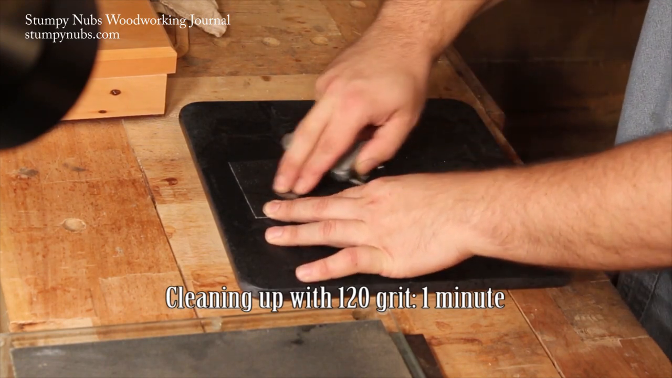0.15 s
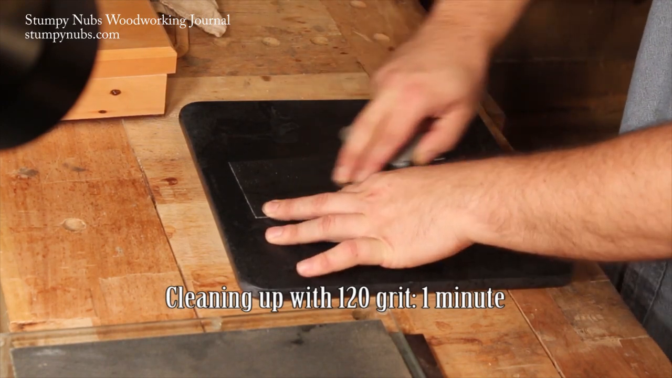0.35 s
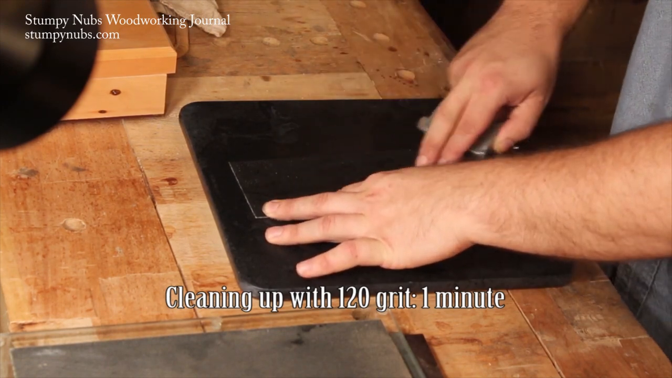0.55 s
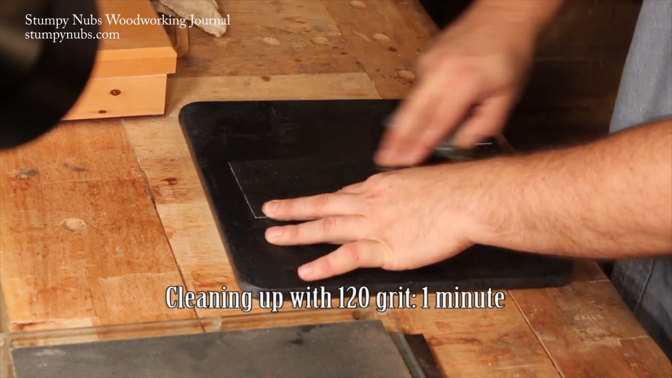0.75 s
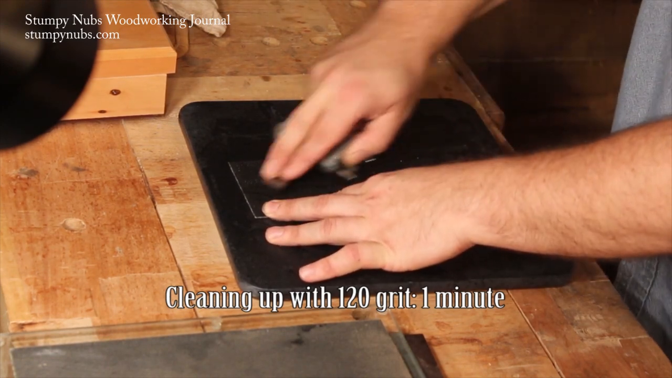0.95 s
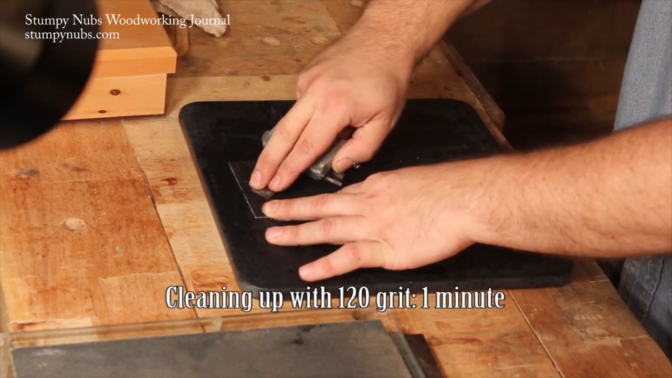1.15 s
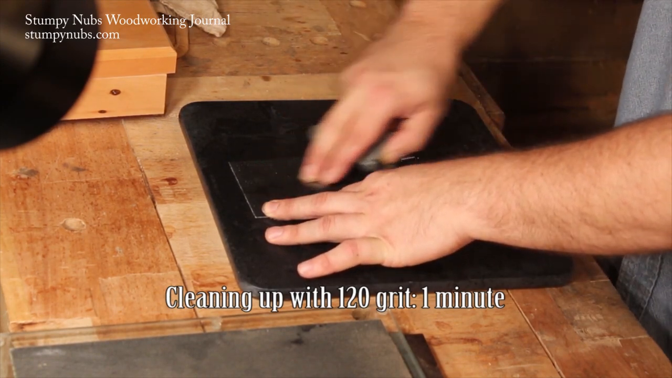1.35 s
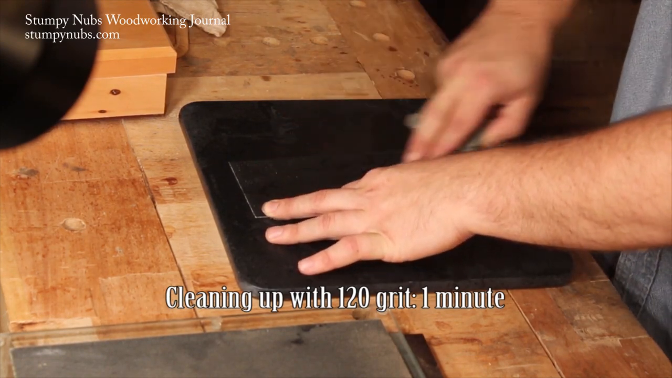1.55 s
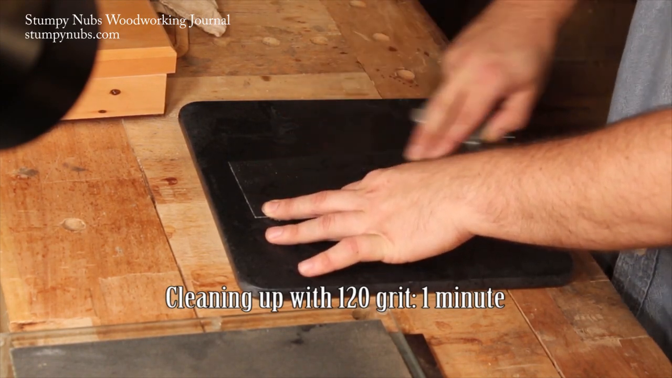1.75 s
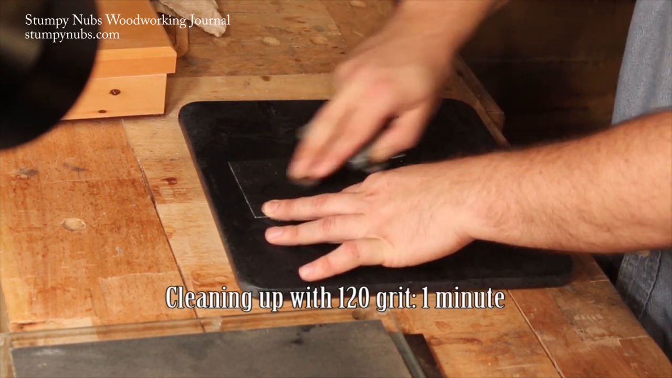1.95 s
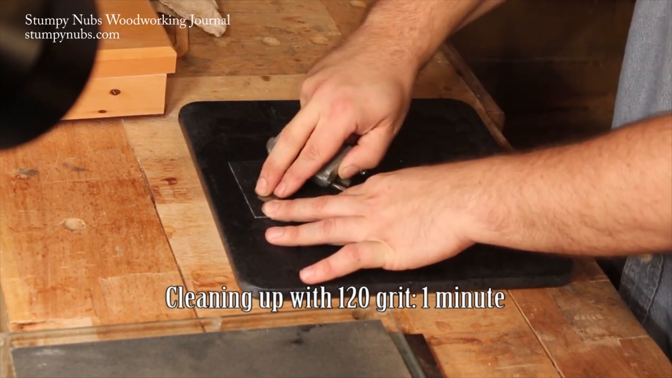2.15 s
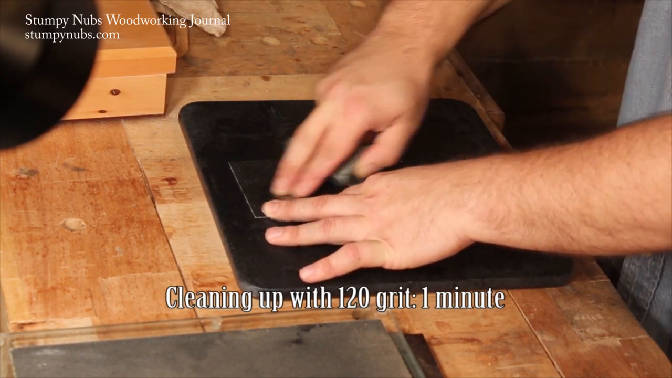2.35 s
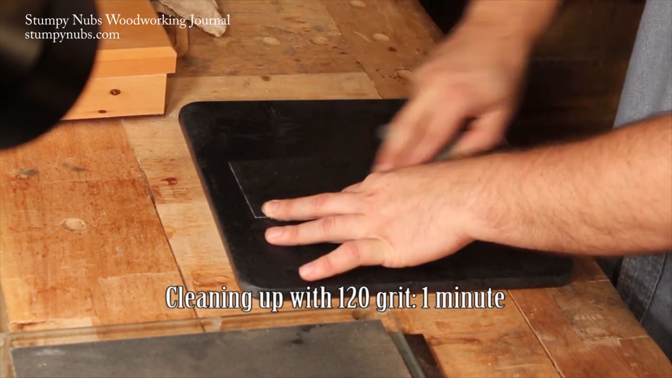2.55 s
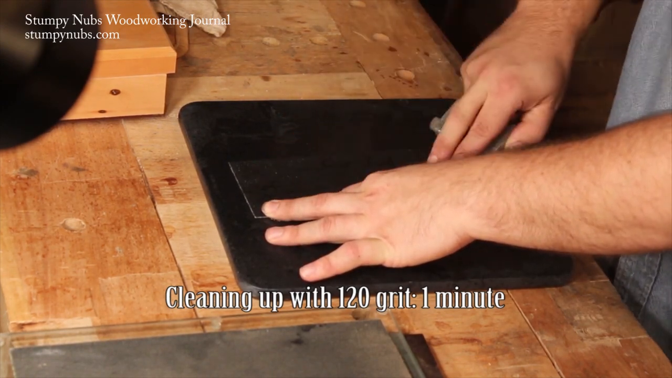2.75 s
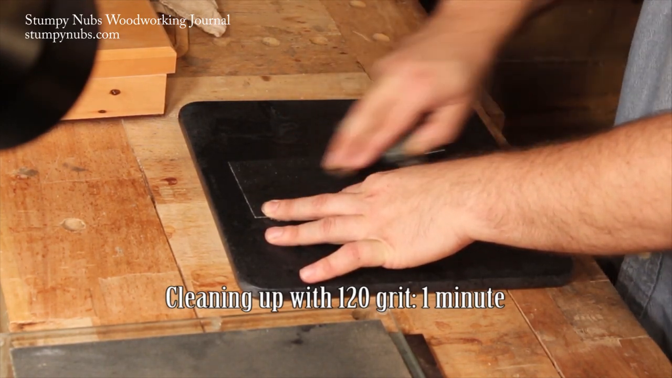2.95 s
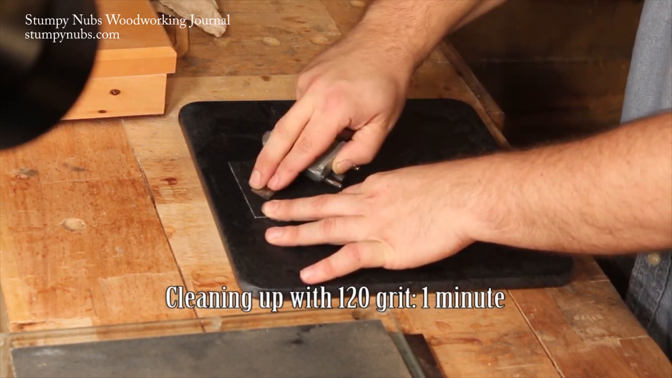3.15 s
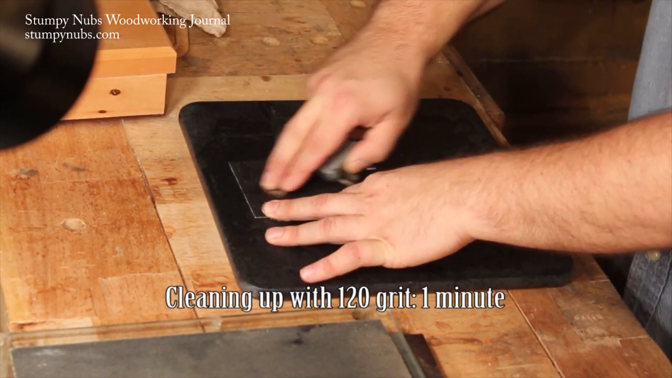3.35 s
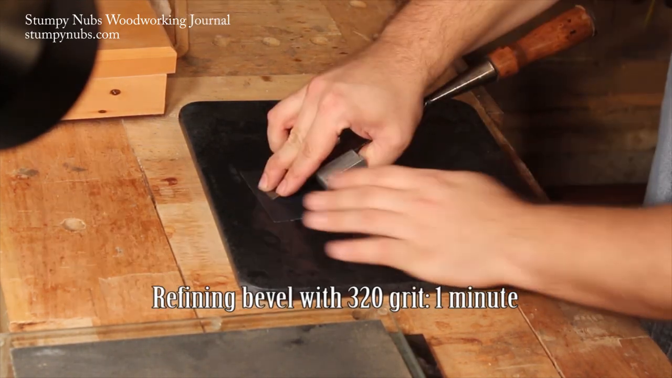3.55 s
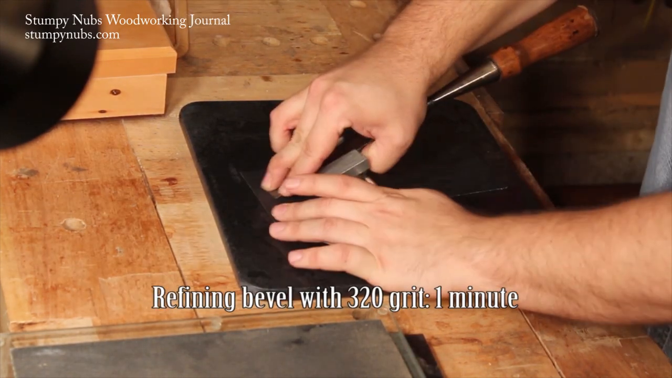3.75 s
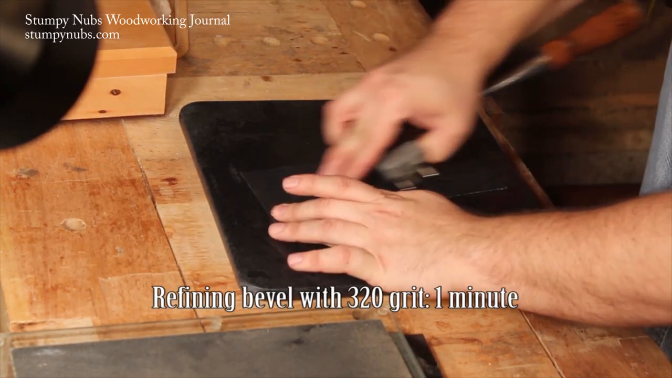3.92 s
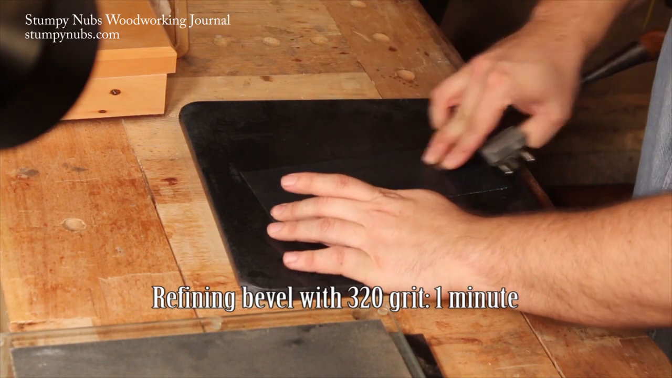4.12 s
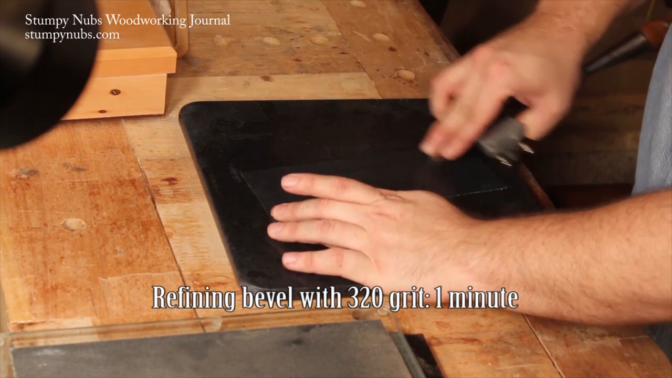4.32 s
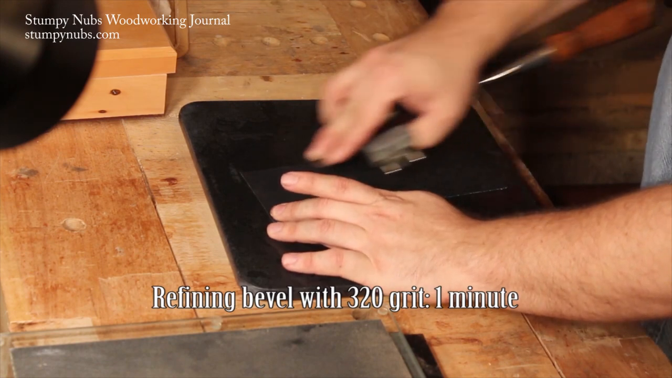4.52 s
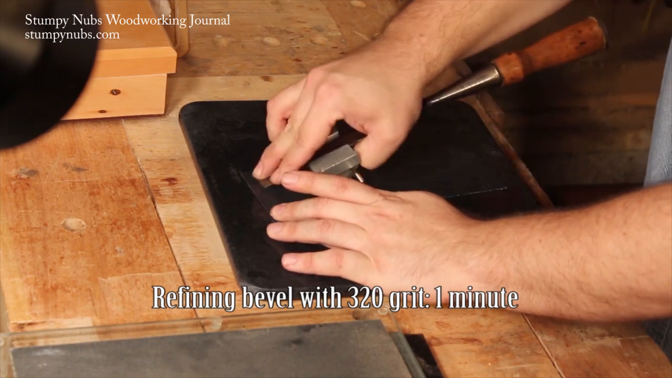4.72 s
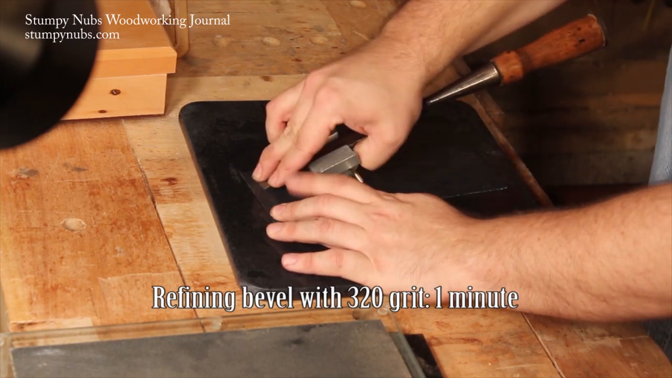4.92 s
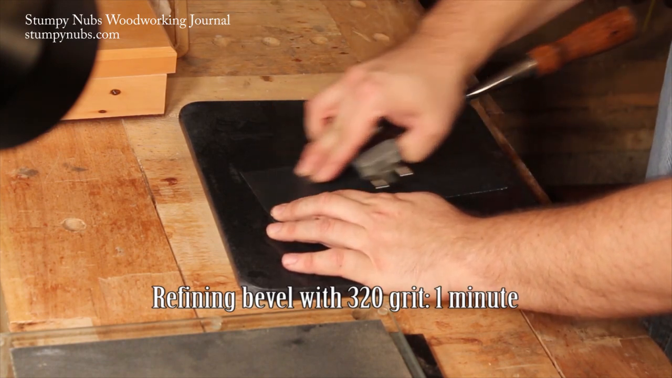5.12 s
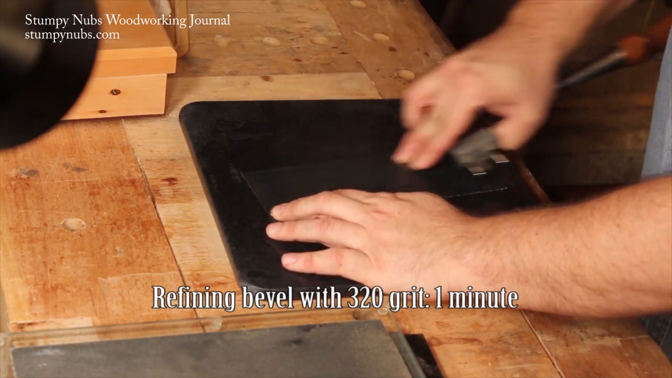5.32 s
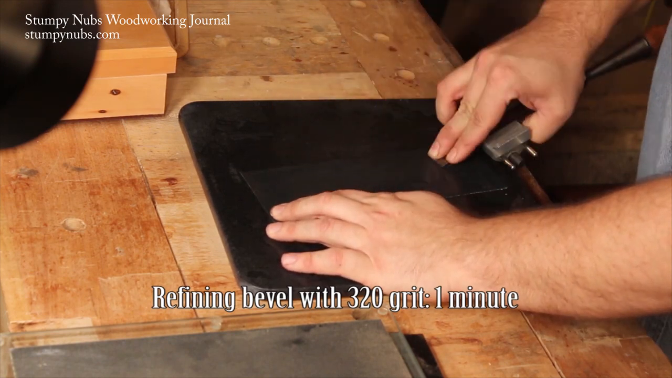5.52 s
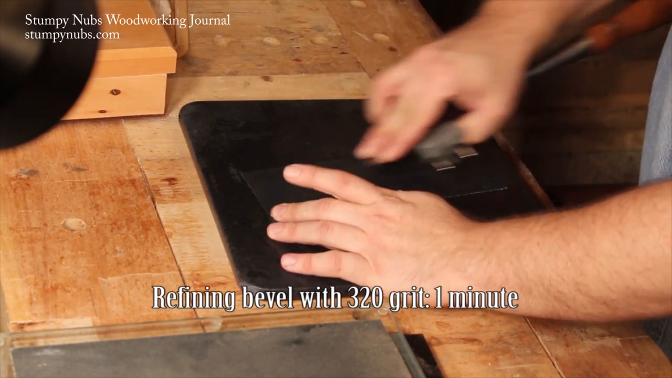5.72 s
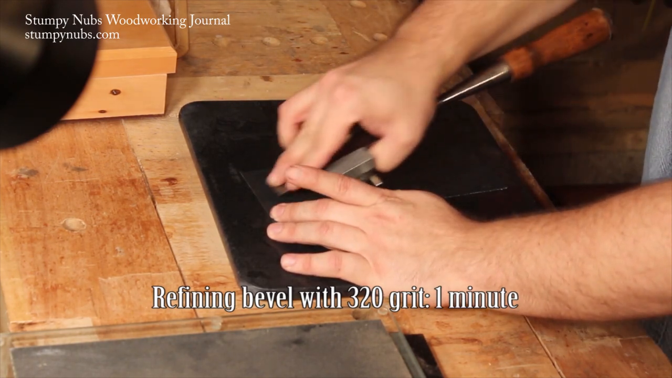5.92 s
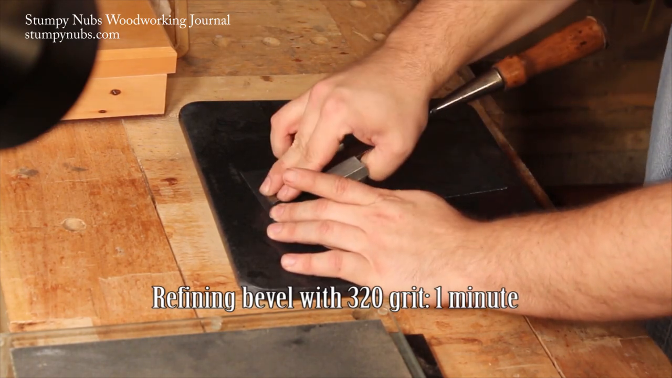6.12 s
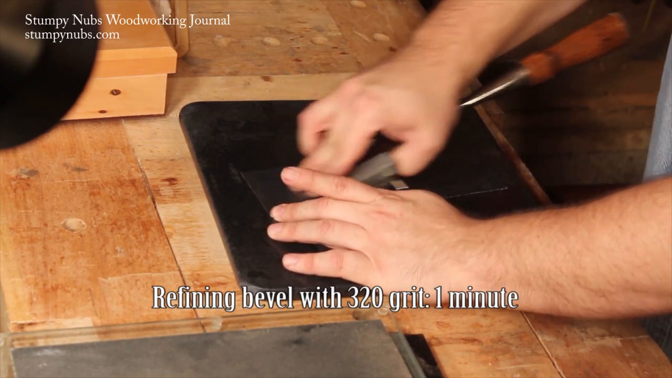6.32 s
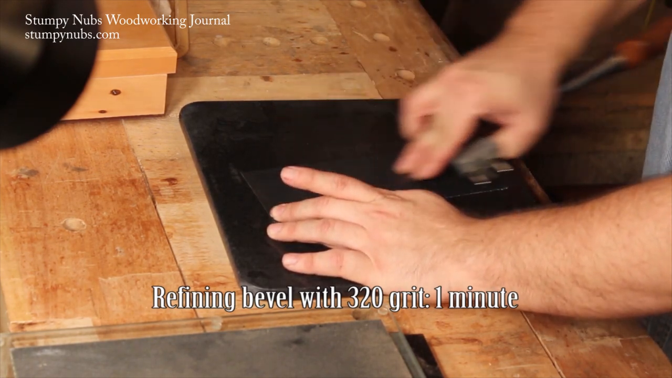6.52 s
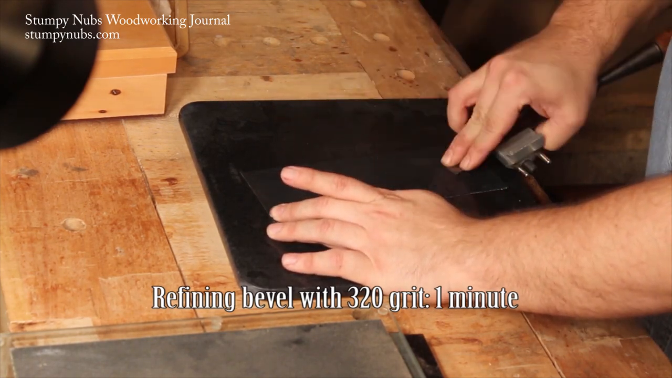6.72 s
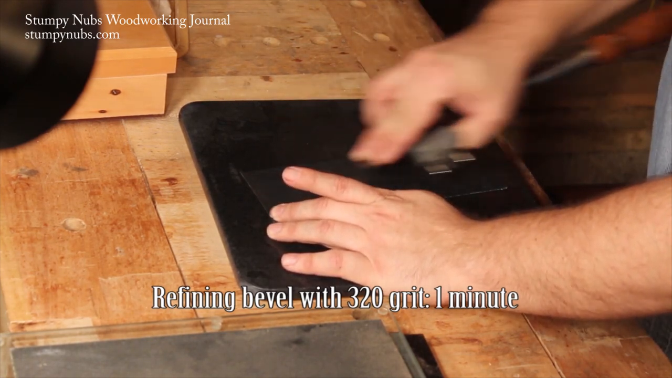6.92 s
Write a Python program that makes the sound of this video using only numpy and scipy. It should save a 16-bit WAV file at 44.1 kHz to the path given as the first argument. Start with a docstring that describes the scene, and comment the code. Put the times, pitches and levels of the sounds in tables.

```python
"""A quiet workshop: a chisel in a honing guide is drawn over sandpaper on a glass plate.
Four strokes on coarse grit, a hard splice, three on fine. Random grit taps ring blade and plate as resonances.
The guide is set down, bounces and rattles off the plate's edge: brief force pulses ring four bodies.
Sine hum near mains pitch, a passing low drone, bench thumps and filtered-noise air lie behind; one microphone."""
import sys
import numpy as np
from scipy import signal
from scipy.fft import rfft, irfft, next_fast_len
from scipy.io import wavfile
from scipy.ndimage import uniform_filter1d, map_coordinates

SR = 44100
rng = np.random.default_rng(int(sys.argv[2]) if len(sys.argv) > 2 else 0)


def unload_wav(signal):
    """Save mono or channel-first audio to the path in sys.argv[1] as 16-bit WAV at rate SR, clipped to [-1, 1]."""
    wavfile.write(
        sys.argv[1],
        SR,
        np.round(np.clip(np.atleast_2d(signal).T, -1, 1) * 32767).astype(np.int16),
    )


def amplitude_ratio(level_db):
    """Convert a level in decibels to the matching linear amplitude (field) ratio."""
    exponent = np.asarray(level_db, float) / 20
    return 10 ** exponent


N = 311787
SPLICE_S = 3.567
# paper: 0 = coarse grit (before the splice), 1 = fine grit (after it)


def unit(x):
    """Scaled to rms 1."""
    return x / np.sqrt(np.mean(x ** 2) + 1e-20)


def along(points, hz):
    """(f/Hz, value) points interpolated on a log frequency axis."""
    f, v = np.transpose(points)
    return np.interp(np.log(hz + 1), np.log(f + 1), v)


def curve_db(rows, outside_db=-120):
    """(t/s, level/dB) points as one level per sample."""
    s, db = np.transpose(rows)
    return np.interp(np.arange(N) / SR, s, db, outside_db, outside_db)


def swells(rows):
    """A gain made of bell-shaped swells."""
    t = np.arange(N) / SR
    return sum(amplitude_ratio(db) * np.exp(-((t - mid_s) / spread_s) ** 2) for mid_s, spread_s, db in rows)


def wobble(knots_hz):
    """A smooth random curve."""
    knots = rng.standard_normal(int(N * knots_hz / SR) + 4)
    return map_coordinates(knots, [np.arange(N) * knots_hz / SR])


def filtered(x, response):
    """x times a complex response of frequency."""
    m = next_fast_len(N + SR // 2)
    return irfft(rfft(x, m) * response(np.fft.rfftfreq(m, 1 / SR)), m)[..., :N]


def coloured(x, points):
    """x shaped by (f/Hz, level/dB) points, scaled to rms 1."""
    return unit(filtered(x, lambda f: amplitude_ratio(along(points, f))))


def ring(x, modes):
    """x through a sum of resonances (f/Hz, width/Hz, level/dB), scaled so that white noise keeps its rms."""
    def response(f):
        h = 0
        for k, (centre, width, db) in enumerate(modes):
            resonance = 1j * f * width / (centre * centre - f * f + 1j * f * width)
            h = h + (-1) ** k * amplitude_ratio(db) * resonance
        return h / np.sqrt(np.mean(abs(h) ** 2))
    return filtered(x, response)


def for_paper(rows, paper):
    """Of the last two columns, keeps the one for this paper."""
    return [(*row[:-2], row[paper - 2]) for row in rows]


# hiss colour: f/Hz, relative level/dB coarse, fine
GRIT_COLOUR = [(300, -17, -102), (1630, -1, 9), (2950, -4, -18.5), (4700, 5.5, 11), (6200, 0, 2.5),
               (7260, 0.5, 5.5), (8760, -2, -1.5), (11600, -6.5, -3.5), (15600, -11.5, -11)]
# thin cutting edge: f/Hz, width/Hz, relative level/dB
EDGE_MODES = [(7700, 93, -1), (8290, 60, 10)]
# steady edge ring over the hiss: level/dB coarse, fine
EDGE_OVER_HISS_DB = (-13.5, -12)
# the edge sings out: middle t/s, spread/s, level over the hiss/dB
EDGE_SINGS = [(4.11, 0.16, -6), (5.38, 0.067, -16), (6.5, 0.32, -15)]
# one blade mode rings out: middle t/s, spread/s, level over the blade/dB
FREE_RING_SWELLS = [(2.58, 0.057, -6.5), (3.53, .06, -10), (5.27, 0.11, -1)]


def stroke(paper, taps_hz, spread_db, shudder_db, patchy_db, bench_db):
    """The same taps drive blade, plate, bench and hiss; the hand's pressure shudders."""
    drawn, drawn_upper = stroke_gains(paper)
    scuffed = scuffs(paper)
    blade_gain, plate_gain, hiss_gain = drawn + scuffed
    upper_gain = drawn_upper + scuffed[1] * amplitude_ratio(-5)
    shudder = amplitude_ratio(shudder_db * (wobble(50) + 0.4 * wobble(18)))
    taps = grit(taps_hz, spread_db, patchy_db) * shudder
    blade = blade_ring(taps * blade_gain, paper)
    blade += free_blade_ring(taps * blade_gain * swells(FREE_RING_SWELLS))
    plate = plate_ring(taps * plate_gain, taps * upper_gain, paper)
    bench = bench_ring(taps * plate_gain * amplitude_ratio(bench_db), paper)
    rough = taps + 1.2 * rng.standard_normal(N)
    hiss = hiss_gain * coloured(rough, for_paper(GRIT_COLOUR, paper))
    edge_gain = drawn[2] * (amplitude_ratio(EDGE_OVER_HISS_DB[paper]) + swells(EDGE_SINGS))
    edge = ring(taps * edge_gain, EDGE_MODES)
    return blade + plate + bench + hiss + edge


def grit(taps_hz, spread_db, patchy_db):
    """Abrasive grains catch the edge: taps of uneven size whose colour drifts as the edge moves along."""
    taps = rng.random(N) < taps_hz / SR
    size_db = spread_db * np.minimum(rng.exponential(size=N), 3.5)
    taps = taps * rng.standard_normal(N) * amplitude_ratio(size_db)
    z = signal.stft(taps, nperseg=512)[2]
    field = uniform_filter1d(rng.standard_normal(z.shape), size=5, axis=0)  # smooth over frequency
    field = uniform_filter1d(field, size=16, axis=1)  # and over time
    return unit(signal.istft(z * amplitude_ratio(patchy_db * unit(field)), nperseg=512)[1][:N])


# strokes: start t/s, full speed t/s, slowing from t/s, stop t/s,
# base level/dB, its change over the stroke/dB
STROKE_TIMES = [(0.145, .29, .63, 0.69, -28, 4.5), (1.225, 1.428, 1.64, 1.782, -26, 0.5),
                (2.327, 2.554, 2.72, 2.842, -25.5, -2), (3.334, 3.563, 3.7, 3.765, -31, 5.5),
                (3.788, 3.93, 4.185, 4.24, -29, -1.5), (4.958, 5.228, 5.45, 5.547, -26.5, -4.5),
                (6.273, 6.396, 6.69, 6.77, -29.5, -7.5)]


def motion(paper):
    """Hand speed (0-1) with sine ramps, progress (0-1) and base level of the strokes on one grit."""
    t = np.arange(N) / SR
    speed, progress, level_db = np.zeros((3, N))
    for start, full, slowing, stop, db, change_db in STROKE_TIMES:
        if (start > SPLICE_S) == paper:
            u = (t - start) / (stop - start)
            on = (u > 0) & (u < 1)
            ramp = np.minimum((t - start) / (full - start), (stop - t) / (stop - slowing))
            speed = np.where(on, np.sin(np.pi / 2 * np.clip(ramp, 0, 1)), speed)
            progress = np.where(on, u, progress)
            level_db = np.where(on, db + change_db * u, level_db)
    return speed, progress, level_db


# each body, coarse then fine: level over the base at the start/dB, at the end/dB, power of speed
BODY_FOLLOWS = {"blade": [(0, 0, 2.6), (0, 0, 2.6)], "plate": [(-4.5, -6.5, 2.17), (-7, -15, 0.87)],
                "hiss": [(-9, -7.5, 2.55), (-12, -6, 2.3)]}
# each body: extra level at mid-stroke/dB coarse, fine
MID_STROKE_DB = {"blade": (-1.1, -0.4), "plate": (-0.54, 0.5), "hiss": (3.3, 4)}
# plate modes over 900 Hz, coarse then fine: level over the lower at the start/dB, at the end/dB
UPPER_PLATE_DB = [(0.44, 2.3), (-0.5, 5.3)]


def stroke_gains(paper):
    """Gains of blade, plate and hiss as powers of speed; upper plate modes gain as the guide nears the rim."""
    speed, progress, level_db = motion(paper)
    gains = []
    for body, rows in BODY_FOLLOWS.items():
        start_db, end_db, power = rows[paper]
        drift_db = start_db + (end_db - start_db) * progress
        arch_db = MID_STROKE_DB[body][paper] * np.sin(np.pi * progress)
        gains.append(amplitude_ratio(level_db + drift_db + arch_db) * speed ** power)
    start_db, end_db = UPPER_PLATE_DB[paper]
    upper = gains[1] * amplitude_ratio(start_db + (end_db - start_db) * progress)
    return np.array(gains), upper


# scuffs, drags, catches and run-off: t/s, blade level/dB, plate level/dB, hiss level/dB, t60/s
SCUFF_TIMES = [(0, -53.5, -47.5, -57, 0.44), (.1, -54, -52, -61, 1.5), (.73, -46.5, -40, -45, 0.2),
               (1.12, -48, -44.5, -48, 0.37), (1.79, -57, -44, -49, 0.2), (1.82, -78, -54.5, -78, 2.9),
               (2.203, -53, -42, -47, 0.16), (2.351, -39.5, -38, -48, 0.16), (2.86, -45.5, -45.5, -50, 0.2),
               (3.235, -50, -50, -44.5, 0.088), (3.278, -47.5, -49, -56, 0.23),
               (3.325, -45, -36.5, -48, 0.2), (3.585, -50, -48, -56, 0.37), (4.218, -29, -24, -42, 0.46),
               (4.821, -58, -29.5, -73, 0.41), (4.86, -53, -51, -47, .2), (5.471, -31, -37, -55, 0.19),
               (5.515, -30, -24.5, -43, 0.23), (6.105, -47, -41, -49.5, 0.36), (6.2, -49.5, -49, -57, 0.34),
               (6.595, -39, -38, -40, 0.085), (6.614, -31, -45, -33, 0.096), (6.702, -29, -19, -46, 0.12),
               (6.733, -33, -27, -43, 0.13), (6.79, -49.5, -56, -78, 0.36)]


def scuffs(paper):
    """Scuffs, drags, catches and run-off, short or long: a quick linear rise under an exponential fade."""
    rise_s = 0.0096
    gain = np.zeros((3, N))  # blade, plate, hiss
    for s, *db, t60_s in SCUFF_TIMES:
        if (s > SPLICE_S) == paper:
            at = round(s * SR)
            t = np.arange(N - at)[:SR] / SR
            swell = np.minimum(t / rise_s, 1) * amplitude_ratio(-60 * t / t60_s)
            gain[:, at:][:, :SR] += amplitude_ratio(db)[:, None] * swell
    return gain


# steel blade: f/Hz, width/Hz, relative level/dB coarse, fine
BLADE_MODES = [(2155, 315, -5.5, -5), (2623, 48, -1.5, -3.5), (2796, 130, -4, -7.5), (3222, 120, 2.5, -1.5),
               (3514, 190, 0.5, -3), (3620, 84, 4, -0.5), (3894, 104, 3.5, -1.5), (4450, 77, 0, -5.5),
               (4685, 160, -11.5, -15), (5320, 87, -1.5, -14)]


def blade_ring(x, paper):
    """The steel blade's resonances."""
    return ring(x, for_paper(BLADE_MODES, paper))


def free_blade_ring(x):
    """The one blade mode that rings out, alone."""
    return ring(x, [BLADE_MODES[6][:3]])


# glass plate: f/Hz, width/Hz, relative level/dB coarse, fine
PLATE_MODES = [(469, 50, -14, -4.5), (563.4, 45, -4.5, -3.5), (629, 35.5, -1, 2.5), (732, 73, -4.5, 2.5),
               (1032.5, 59.6, 2, 4), (1117, 92, 2, 4.5), (1306, 120, -3, -3), (1673, 89, -6, -3.5)]


def plate_ring(x, x_upper, paper):
    """The glass plate: modes below and above 900 Hz, each group with its own push."""
    modes = for_paper(PLATE_MODES, paper)
    lower = [mode for mode in modes if mode[0] < 900]
    upper = [mode for mode in modes if mode[0] > 900]
    return (ring(x, lower) + ring(x_upper, upper)) / np.sqrt(2)


# bench: f/Hz, width/Hz, relative level/dB first stretch, second
BENCH_MODES = [(117.4, 39, -1, -6.5), (148, 32, 1.5, -4.5), (194, 16, -1, 2), (253, 26, -1.5, 1),
               (375, 31, -5.5, 1.5)]


def bench_ring(x, paper):
    """The bench's low resonances."""
    return ring(x, for_paper(BENCH_MODES, paper))


# guide touches down: t/s, plate push/dB, upper plate modes over that/dB, blade push/dB, bench push/dB
TOUCHDOWNS = [(1.122, -37, -8, -37, -37), (1.187, -43.5, 6, -38, -67), (1.254, -44, 6, -39, -65),
              (2.207, -30.5, 0, -32.5, -34.5), (3.24, -37, .8, -33.5, -44), (3.602, -40.5, .8, -41.5, -43),
              (3.747, -48, -6, -44, -61), (4.816, -9, 4, -28.5, -34.5), (6.108, -31, -2, -33, -38),
              (6.144, -19, -10.5, -41, -48), (6.204, -28, -6, -42, -43.5)]
# guide lifts or drops off the rim: t/s, plate push/dB, blade push/dB, guide push/dB, bench push/dB,
# rattle length/ms
RIM_CLATTER = [(.751, -39, -32.5, -50, -65, 5.3), (1.726, -39, -30, -32, -41.5, 2),
               (1.799, -47, -34, -60.5, -42, 5.3), (4.2, -35, -14, -17.5, -57, 3.7),
               (4.208, -9.5, -33, -14, -52, 2.74), (4.233, -7.5, -38, -23, -23, 7.4),
               (4.864, -48, -33, -39, -28, 4.5), (5.474, -34, -28, -23.5, -44, 5.3),
               (5.518, -16.5, -37, -25, -36, 3), (5.599, -55, -34.5, -46, -46, 2.2),
               (5.721, -56, -53.5, -55, -62, 2), (6.701, -9.5, -21, -14, -45, 3.8),
               (6.733, -9, -21, -36, -21, 5.6)]
# brass roller frame: f/Hz, width/Hz, relative level/dB
GUIDE_MODES = [(1340, 360, -6.5), (1740, 99, 2.5), (2490, 59, -5), (3790, 270, -8.5)]


def knocks():
    """Each contact mixes a blow with a ragged rattle; the blow's share shrinks as the contact lengthens."""
    contacts = [(s, plate, plate + upper, blade, blade - 29, bench, 1.68)
                for s, plate, upper, blade, bench in TOUCHDOWNS]
    contacts += [(s, plate, plate - 9.5, blade, guide, bench, ms)
                 for s, plate, blade, guide, bench, ms in RIM_CLATTER]
    t = np.arange(SR // 16) / SR
    # plate, upper plate, blade, guide, bench
    contact_s = np.array([[.00015], [.00012], [.00004], [.00006], [.0005]])
    force = np.zeros((len(contact_s), N + len(t)))
    for s, *db, ms in contacts:
        u = 1000 * t / max(ms, 0.2)
        blow = 3 * np.exp(-ms / 1.7) * t / contact_s * np.exp(1 - t / contact_s)
        rattle = 0.93 * rng.standard_normal(len(t)) * u * np.exp(-u)
        push = blow + rattle
        push /= np.linalg.norm(push, axis=1)[:, None]
        force[:, round(s * SR):][:, :len(t)] += amplitude_ratio(db)[:, None] * push
    plate, upper, blade, guide, bench = force[:, :N]
    steel = amplitude_ratio(16.5) * blade_ring(blade, paper=0)
    brass = amplitude_ratio(23.5) * ring(guide, GUIDE_MODES)
    glass = amplitude_ratio(13.0) * plate_ring(plate, upper, paper=1)
    second = np.arange(N) >= SPLICE_S * SR
    wood = amplitude_ratio(17.0) * sum(bench_ring(bench * (second == k), k) for k in range(2))
    return steel + brass + glass + wood


# light return slide: t/s, level/dB rms
GRAZE_LEVEL = [(1.8, -77), (1.86, -60), (2.15, -63), (2.21, -86)]
# guide barely touching: f/Hz, width/Hz, relative level/dB
LIFTED_MODES = [(1560, 90, -4), (2470, 110, 1.5), (3640, 120, -1), (4520, 200, -7)]


def graze():
    """On one return the guide brushes the paper: noise through its resonances."""
    return ring(amplitude_ratio(curve_db(GRAZE_LEVEL)) * rng.standard_normal(N), LIFTED_MODES)


# bench sways under the hands: t/s, relative level/dB, f/Hz
BENCH_SWAYS = [(2.35, -27, 45), (2.92, -54, 48.6), (3.55, -38, 48)]


def thumps():
    """A few slow cycles that swell and die."""
    t = np.arange(N) / SR
    out = np.zeros(N)
    for s, db, hz in BENCH_SWAYS:
        after = np.maximum(t - s, 0)
        swell = np.e * after / 0.031 * np.exp(-after / 0.014)
        out += amplitude_ratio(db) * swell * np.sin(2 * np.pi * hz * after)
    return out


# room decay: f/Hz, t60/s
WALL_DECAY = [(200, 0.34), (1000, 0.31), (4000, 0.21), (12000, 0.089)]


def walls(x):
    """The room's answer: a noise tail, each frequency dying at its own speed."""
    hz, t, z = signal.stft(rng.standard_normal(SR // 2), SR, nperseg=256)
    decay = amplitude_ratio(-60 * t / along(WALL_DECAY, hz)[:, None])
    tail = signal.istft(z * decay, SR, nperseg=256)[1]
    delayed = np.pad(x, (300, 0))
    return signal.fftconvolve(delayed, tail / np.linalg.norm(tail))[:N]


def tones(rows, waver_db, drift_rad):
    """Steady tones (f/Hz, level/dB rms), each wavering a little in level and phase."""
    t = np.arange(N) / SR
    out = np.zeros(N)
    for hz, db in rows:
        level = np.sqrt(2) * amplitude_ratio(db + waver_db * wobble(2.4))
        out += level * np.sin(2 * np.pi * hz * t + drift_rad * wobble(5.3))
    return out


# hum: f/Hz, level/dB rms
HUM_TONES = [(60, -43), (120, -52), (149, -63.5), (240, -65.5), (300, -65), (420, -73)]


def hum():
    """Mains hum: nearly steady sines."""
    return tones(HUM_TONES, waver_db=0.6, drift_rad=0.15)


# low tone comes and goes: middle t/s, spread/s, level/dB rms
PULSES = [(.76, 0.19, -51), (1.8, 0.19, -51.5), (2.38, 0.087, -56), (3.0, 0.15, -54), (3.42, 0.14, -49.5),
          (4.15, 0.16, -53.5), (5.3, 0.36, -50.5), (5.96, 0.12, -48.5), (6.36, .1, -53.5),
          (6.85, 0.14, -53.5)]


def pulsing_tone():
    """A low sine in bell-shaped swells."""
    return swells(PULSES) * tones([(198.4, 0)], waver_db=4.5, drift_rad=0.5)


# passing drone: t/s, level/dB
DRONE_LEVEL = [(3.5, -72), (3.568, -41), (3.964, -43), (4.012, -44), (4.128, -40.5), (4.954, -44.5),
               (5.22, -51.5), (5.362, -48), (5.4, -60)]
# drone partials: f/Hz, relative level/dB
DRONE_PARTIALS = [(77, 0), (105, -10.5), (135, -9), (152, -13)]


def drone():
    """Low wavering sines under one passing level curve."""
    return amplitude_ratio(curve_db(DRONE_LEVEL)) * tones(DRONE_PARTIALS, waver_db=1.5, drift_rad=0.8)


# air and microphone: f/Hz, relative density/dB
AIR_COLOUR = [(15, -29), (25, -16), (48, -8), (85, -10.5), (137, -10), (200, -11), (351, -20), (688, -26),
              (787, -20.5), (1460, -33), (1590, -30.5), (2080, -35.5), (15700, -41.5)]


def air():
    """Air and microphone hiss: coloured noise, slowly wavering in level."""
    return amplitude_ratio(-50 + 1.44 * wobble(2.58)) * coloured(rng.standard_normal(N), AIR_COLOUR)


# faint blurred whine: f/Hz, width/Hz, level/dB rms
WHINE_MODE = [(1577, 12, -69)]


def whine():
    """Noise through one narrow resonance."""
    return amplitude_ratio(WHINE_MODE[0][-1]) * ring(rng.standard_normal(N), WHINE_MODE)


def workshop():
    """The background sum."""
    return hum() + pulsing_tone() + drone() + air() + whine()


def scene():
    """Two stretches of honing joined by a hard splice."""
    first = np.arange(N) < SPLICE_S * SR
    blows = knocks()
    coarse = stroke(paper=0, taps_hz=12000, spread_db=2.5, shudder_db=1.1, patchy_db=1.9, bench_db=-16)
    fine = stroke(paper=1, taps_hz=18000, spread_db=2.2, shudder_db=0.9, patchy_db=1.8, bench_db=-20)
    coarse = coarse + graze() + blows * first
    fine = fine + blows * ~first
    honing = first * (coarse + amplitude_ratio(-10.0) * walls(coarse))
    honing = honing + fine + amplitude_ratio(-14.0) * walls(fine)
    return np.tile(honing + thumps() + workshop(), (2, 1))


# amplifier hiss: f/Hz, relative density/dB
AMPLIFIER_COLOUR = [(59, -28), (100, -10), (143, -8), (1440, -3.5), (1700, -5), (3010, -1), (15700, -4.5)]


def amplifier_hiss():
    """Faint coloured noise, opposite in sign in the two channels."""
    hiss = amplitude_ratio(-62) * coloured(rng.standard_normal(N), AMPLIFIER_COLOUR)
    return np.array([hiss, -hiss])


def low_pass(x):
    """Removes everything above the highest recorded frequency."""
    return signal.sosfilt(signal.butter(12, 15810, fs=SR, output="sos"), x)


def record(dry):
    """One microphone on two channels, plus amplifier hiss."""
    mix = dry + amplifier_hiss()
    return low_pass(mix)


dry = scene()
out = record(dry)
unload_wav(out)
```